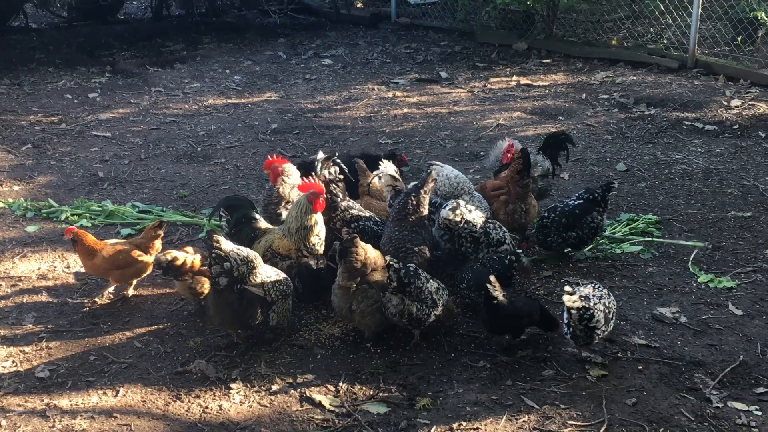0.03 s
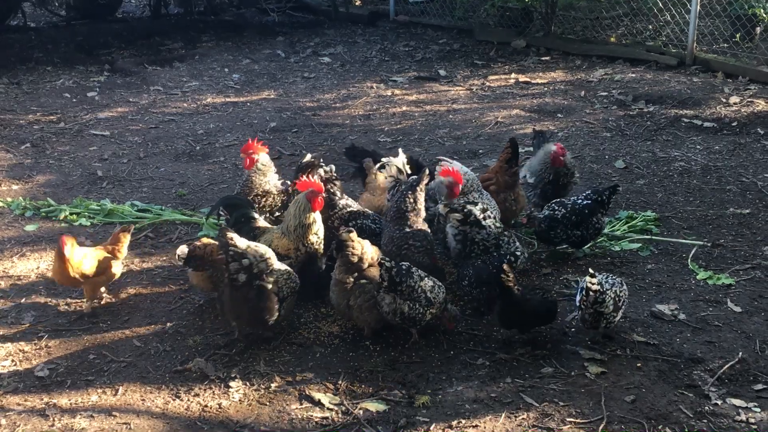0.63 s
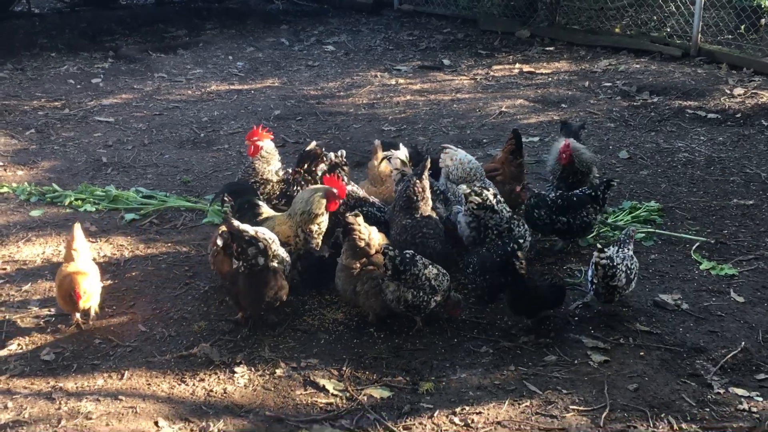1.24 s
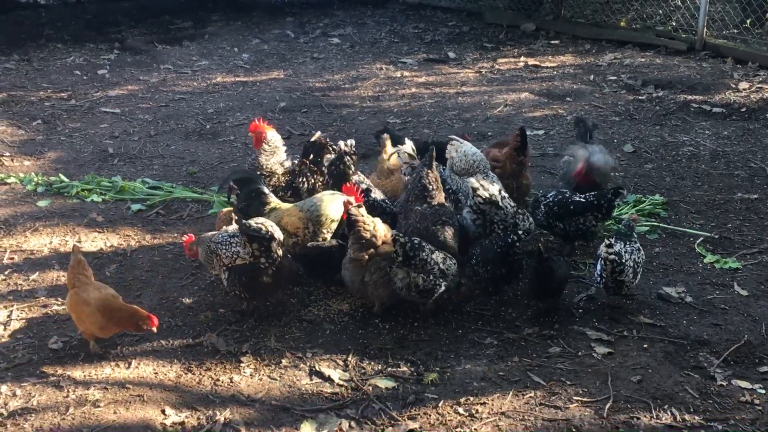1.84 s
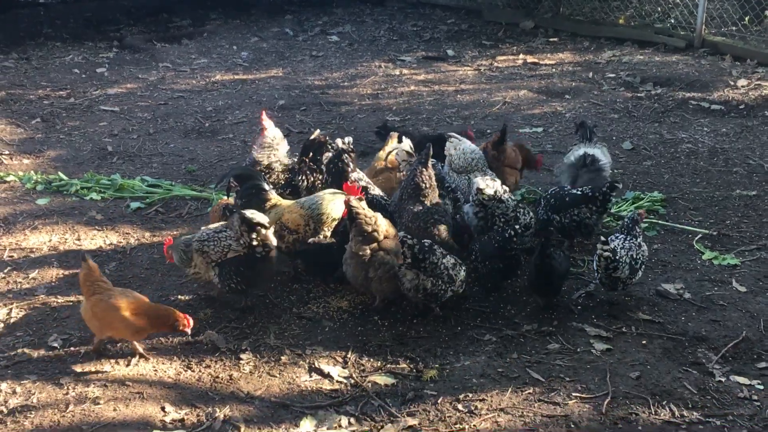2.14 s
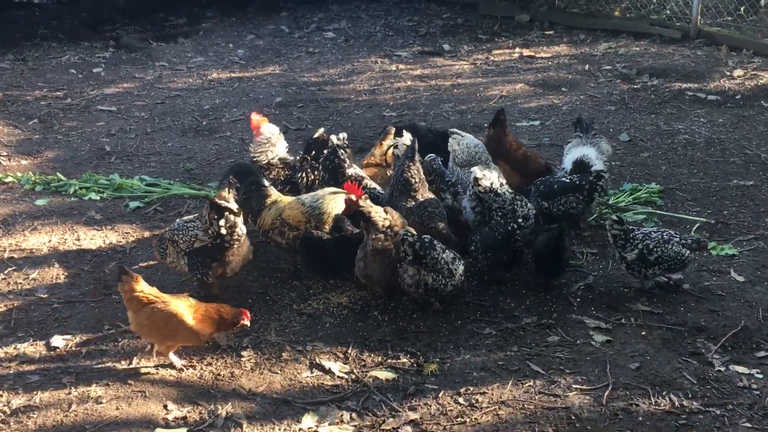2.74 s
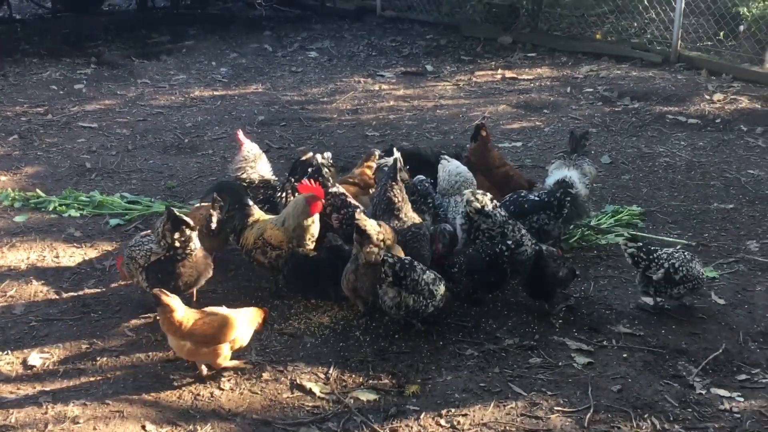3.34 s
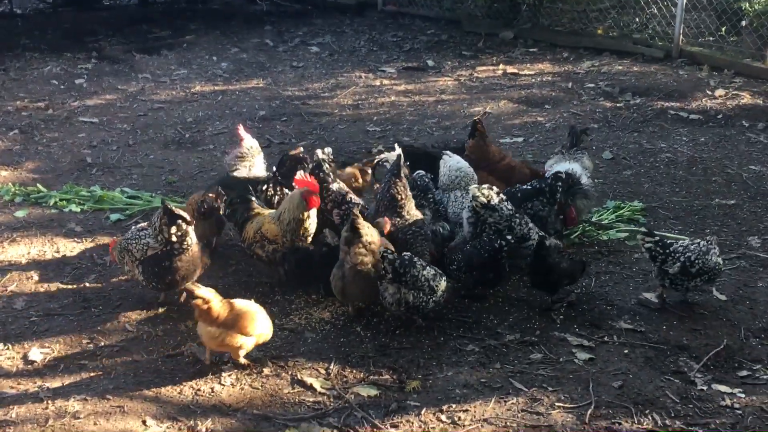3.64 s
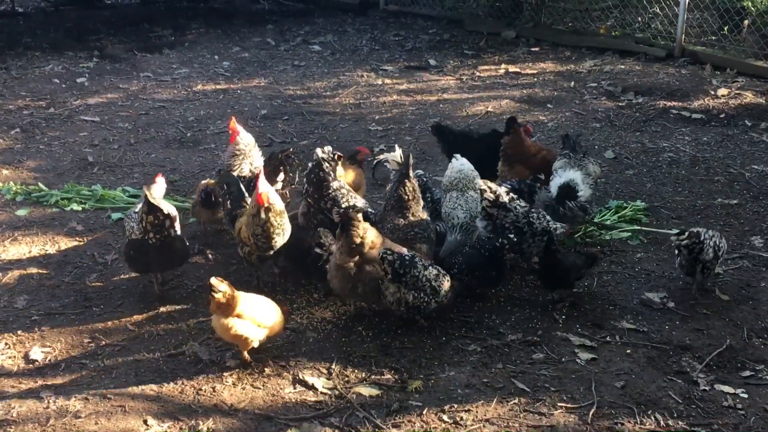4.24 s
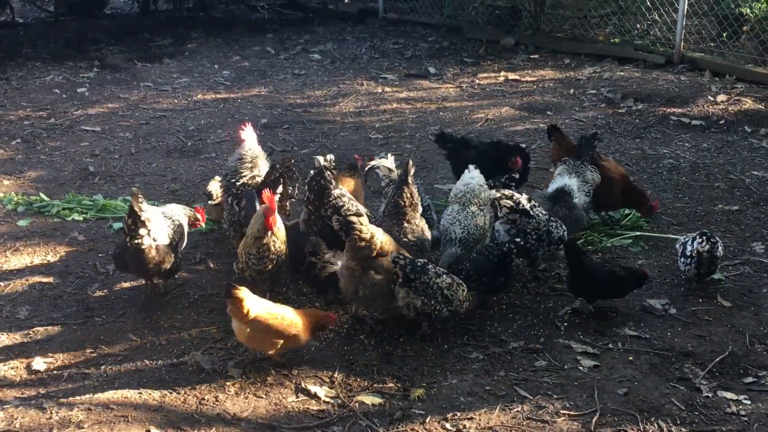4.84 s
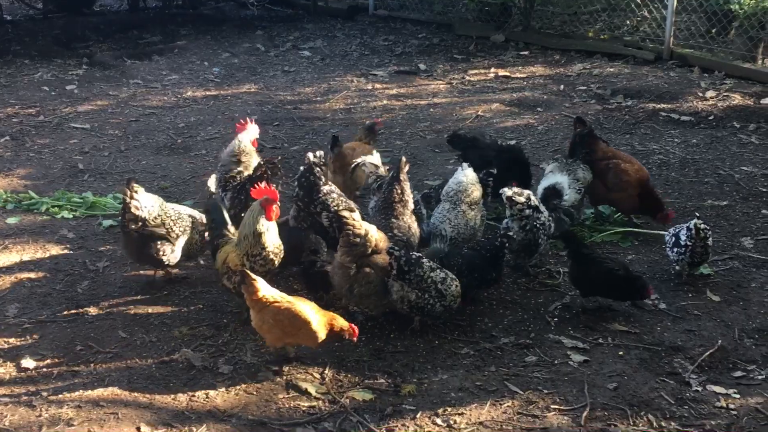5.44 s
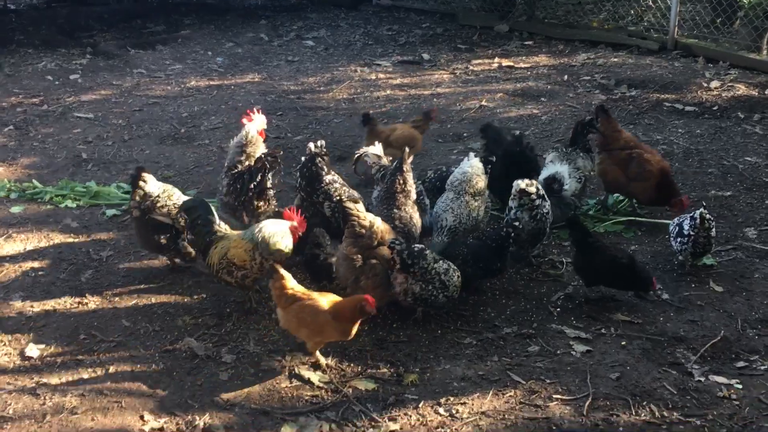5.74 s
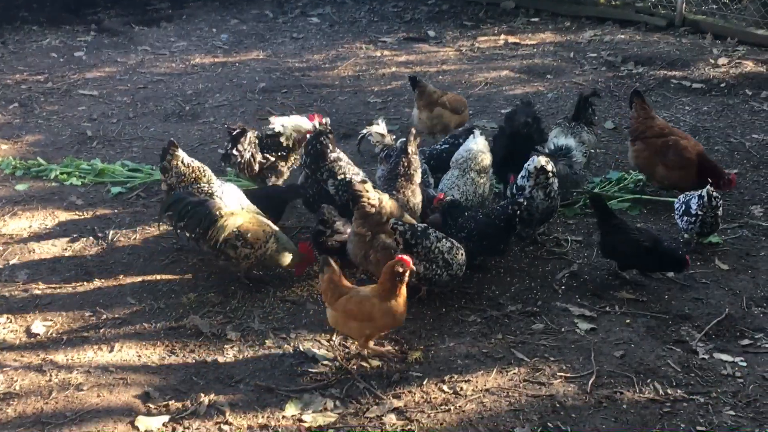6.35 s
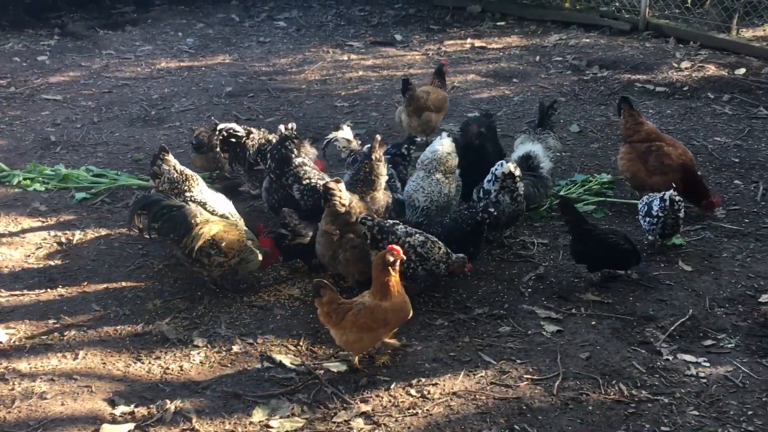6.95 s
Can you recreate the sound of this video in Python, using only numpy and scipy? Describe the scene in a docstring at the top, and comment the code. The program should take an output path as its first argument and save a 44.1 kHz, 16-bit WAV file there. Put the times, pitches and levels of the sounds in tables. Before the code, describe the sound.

A rooster crows once, hoarse then clear, over softly clucking, pecking hens and small birds chirping in a farm yard.

```python
"""A rooster crows in a farm yard under trees: a hoarse first note, then a long one that clears and sinks.
Its syrinx is a harmonic source, filtered by throat and mouth; uneven membrane slaps add a rasp.
Hens cluck, murmur, peck and scratch, small birds whistle gliding chirps, and near the end a distant
rooster crows faintly. Trunks, fence and leaves scatter these sounds into echoes.
Under them lie a low rumble and a faint hiss."""
import sys
import numpy as np
from scipy import signal
from scipy.fft import rfft, irfft
from scipy.io import wavfile
from scipy.ndimage import map_coordinates

SR = 44100
rng = np.random.default_rng(int(sys.argv[2]) if len(sys.argv) > 2 else 0)


def store_pcm(level_fs):
    """Save levels as 16-bit WAV."""
    pcm = np.round(np.clip(level_fs, -1, 1) * 32767).astype(np.int16)
    wavfile.write(sys.argv[1], SR, np.atleast_2d(pcm).T)


N = 316638
TIME = np.arange(N) / SR


def undb(db):
    """Level in decibels to amplitude ratio."""
    return 10 ** (np.asarray(db) / 20)


def unit(x):
    """Normalisation to rms 1."""
    return x / np.sqrt(np.mean(x ** 2) + 1e-20)


def curve(points):
    """Linear interpolation of (t/s, value) points at every sample."""
    return np.interp(TIME, *np.transpose(points))


def spectrum_at(points, hz):
    """Gain of a frequency response (f/Hz, level/dB), interpolated over log frequency."""
    f, db = np.transpose(points)
    return undb(np.interp(np.log(hz + 1), np.log(f), db))


def walk(rate, size=N):
    """Smooth random modulation: a spline through `rate` unit Gaussian values a second."""
    place = np.arange(size) * rate / SR
    return map_coordinates(rng.standard_normal(int(place[-1]) + 4), [place + 1], order=2)


def ring(x, hz, width_hz):
    """Second-order resonance with gain 1 at its centre."""
    return signal.lfilter(*signal.iirpeak(min(hz, .45 * SR), hz / width_hz, fs=SR), x)


def resonate(x, modes):
    """Parallel resonances (f/Hz, bandwidth/Hz, level/dB), each applied twice; rms 1."""
    return unit(sum(undb(db) * ring(ring(x, hz, width), hz, width) for hz, width, db in modes))


def add(track, s, sound):
    """Superposition of a sound on the track from time s."""
    i = max(int(s * SR), 0)
    track[i:i + len(sound)] += sound[:max(N - i, 0)]


def air(hiss_db=-56):
    """Spectral shaping of white noise gives the steady, wide hiss of still air."""
    # f/Hz, relative spectral density/dB
    density = [(30, -20), (55, -1.5), (100, -1), (170, -8.5), (300, -12), (450, -18.5), (900, -14),
               (1400, -20.5), (2100, -20.5), (3400, -20), (5000, -27), (6300, -26), (8000, -33),
               (15500, -39)]
    hz = np.arange(N // 2 + 1) * SR / N
    return undb(hiss_db) * unit(irfft(rfft(rng.standard_normal(N)) * spectrum_at(density, hz), N))


def rumble(rumble_db=-56.5, sway_db=3.5, bump_db=-3, bump_hz=60, bump_s=.054):
    """Amplitude modulation makes low noise sway; short tone bursts are heard as soft bumps."""
    # t/s, relative peak level/dB
    bumps = [(2.105, -41), (2.964, -37.5), (3.5, -37.5), (4.363, -34.5), (6.514, -35.5)]
    out = resonate(rng.standard_normal(N), [(57.1, 34, .5), (97.2, 27, -7)])
    out *= undb(rumble_db + sway_db * walk(9))
    t = TIME[:int(bump_s * SR)]
    bump = np.sin(np.pi * np.sqrt(t / bump_s)) ** 2 * np.sin(2 * np.pi * bump_hz * t)
    for s, db in bumps:
        add(out, s, undb(db + bump_db) * bump)
    return out


def foraging(ticks_per_s=70, spread_db=3, grain_s=.0048, litter_db=-71, peck_db=-69):
    """Random impacts of feet on dry litter and beaks on soil make noise grains; feathers add friction."""
    # the flock shuffling its feathers: t/s, level/dB
    shuffle = [(0, -57), (.6, -55), (1, -59.5), (2.5, -60), (3.7, -61.5), (4.6, -62.5), (7.1, -68.5)]
    ticks = (rng.random(N) < ticks_per_s / SR) * undb(spread_db * np.minimum(rng.exponential(size=N), 3))
    grains = signal.fftconvolve(ticks, np.exp(-TIME[:1024] / grain_s))[:N] * rng.standard_normal(N)
    feathers = undb(curve(shuffle) + 2 * walk(14)) * resonate(rng.standard_normal(N), [(157, 230, 0)])
    litter = undb(litter_db) * resonate(grains, [(2800, 5000, 0)])
    pecks = undb(peck_db) * resonate(grains, [(827, 540, 0)])
    return feathers + litter + pecks


def chirp(length, arch_hz, waver=.019, waver_hz=340, octave_db=-23):
    """A whistle arches through three pitches; fast random modulation makes it buzz slightly; rms 1."""
    u = np.linspace(0, 1, int(length * SR))
    arch = np.polyval(np.polyfit([0, .5, 1], arch_hz, 2), u)
    hz = arch * (1 + waver * walk(waver_hz, size=len(u)))
    phase = 2 * np.pi * np.cumsum(hz) / SR
    swell = signal.windows.tukey(len(u), .35) * undb(3.65 * walk(207.4, size=len(u)))
    # the highest notes are forced, and carry the most octave
    octave = undb(octave_db) * (hz / 5500) ** 4 * np.sin(2 * phase)
    return unit(swell * (np.sin(phase) + octave))


def near_birds(gain_db=-2, arch_octaves=.1, slide_db=-12, slide_s=.05, flick_db=1, flick_s=.011):
    """Frequency sweeps form the calls: arched glides, and high flicks that drop to a low note."""
    # t/s, duration/s, middle f/Hz, glide/octaves, relative level/dB
    glides = [ (0.117, 0.034, 3050, 0.9, -52.5), (0.146, 0.03, 2660, -.6, -61),
              (0.321, 0.024, 4500, 0.4, -52.5), (0.345, .034, 4300, -0.52, -52),
              (0.39, 0.024, 3830, 0.2, -46), (0.809, 0.042, 4280, 0.06, -52),
              (0.851, 0.049, 3400, -0.51, -49.5), (1.079, 0.051, 3810, -0.15, -56.5),
              (1.142, .03, 5700, -.4, -64), (1.154, 0.045, 3590, 0, -54), (1.215, 0.06, 4580, 0, -54.5),
              (1.446, 0.038, 5450, -0.03, -55.5), (1.661, 0.031, 5500, -0.76, -51),
              (1.757, 0.035, 3370, -0.39, -47), (2.006, 0.09, 4090, -0.44, -52),
              (2.111, 0.025, 4710, 0.17, -50), (2.121, 0.2, 5550, -0.45, -53),
              (2.154, 0.036, 3600, -.3, -49.5), (2.55, 0.025, 3320, 0, -54.5),
              (2.62, 0.026, 4700, -0.16, -53), (2.628, 0.073, 3350, 0.42, -57),
              (2.76, 0.035, 2480, -.15, -61), (2.96, 0.035, 3750, -0.12, -49.5),
              (3.109, 0.094, 5720, -0.24, -55), (3.117, 0.11, 4150, -0.5, -55.5),
              (3.249, 0.1, 6000, -.2, -63), (3.307, 0.05, 2800, .7, -58),
              (3.466, 0.044, 3195, -0.52, -59.5), (3.592, 0.03, 1764, 0.12, -55),
              (3.601, 0.079, 4010, .4, -52.5), (3.664, 0.061, 3324, -0.36, -46.5),
              (4.018, 0.047, 2810, 0.55, -56.5), (4.045, 0.048, 4520, -0.33, -48),
              (4.115, 0.028, 4050, .15, -46.5), (4.24, .03, 1950, 0.32, -59),
              (4.237, 0.07, 3050, -0.54, -52), (4.411, 0.021, 5900, -0.45, -58),
              (4.525, .025, 7400, 0.2, -61), (4.527, 0.06, 4400, 0.33, -55),
              (4.564, 0.018, 5320, -0.16, -54), (4.574, 0.05, 3400, -0.44, -55.5),
              (4.629, 0.016, 3900, 0.4, -42.5), (4.746, .08, 2500, -.45, -60.5),
              (4.803, 0.039, 3750, -0.2, -55), (4.933, 0.076, 3870, -0.5, -54.5),
              (5.061, 0.047, 3900, -0.15, -51.5), (5.165, 0.012, 3910, 0.12, -49.5),
              (5.191, 0.017, 5700, -0.54, -55), (5.245, 0.038, 2075, -0.19, -56.5),
              (5.274, 0.088, 3330, -0.78, -51.5), (5.509, 0.091, 5480, -0.34, -52),
              (5.555, 0.042, 4175, 0.58, -52.5), (5.594, 0.058, 3750, -0.39, -49.5),
              (5.784, 0.03, 3700, -0.3, -49), (5.951, 0.039, 4250, 0.16, -47.5),
              (5.996, 0.052, 3300, -0.48, -47.5), (6.038, 0.024, 5800, -0.4, -53),
              (6.234, 0.015, 3750, -0, -49), (6.239, .01, 2000, .5, -54), (6.249, 0.04, 3050, -0.27, -49.5),
              (6.401, 0.063, 5690, 0.02, -50.5), (6.46, 0.039, 3490, .45, -53.5),
              (6.518, 0.014, 5500, -0.45, -53), (6.676, 0.026, 3470, -0.55, -53),
              (6.708, 0.046, 4050, -0.33, -52), (6.904, 0.026, 4350, -0.01, -50),
              (6.952, 0.044, 3523, -0.02, -48)]
    # flick and low note: t/s, relative level/dB
    two_step_calls = [(0.393, -49.5), (2.556, -53), (2.63, -52), (4.051, -58.5), (4.348, -59), (4.695, -54),
                      (5.687, -49), (6.693, -56.5)]
    out = np.zeros(N)
    for s, length, hz, glide, db in glides:
        arch_hz = hz * 2 ** np.array([-glide / 2 - arch_octaves, 0, glide / 2 - arch_octaves])
        buzz = .0211 * (hz / 4200) ** 2
        add(out, s, undb(db + gain_db) * chirp(length, arch_hz, waver=buzz))
        if glide < 0:  # falling calls trail off in a soft slide
            slide = chirp(slide_s, arch_hz[2] * np.linspace(1.12, .75, 3))
            add(out, s + .73 * length, undb(db + slide_db) * slide)
    for s, db in two_step_calls:
        add(out, s - flick_s, undb(db + flick_db) * chirp(flick_s, arch_hz=(3870, 3303, 2820)))
        add(out, s, undb(db + gain_db) * chirp(.0129, arch_hz=(1764, 1496, 1330)))
    return out


def hens_and_distant_rooster(throat_width_hz=380, chest=.29, rise=.0279):
    """Formant filtering: one throat resonance weights the harmonics; the chest adds some fundamental."""
    # hen clucks and murmurs, then in the last row a faint, distant rooster's crow:
    # t/s, duration/s, pitch f/Hz, throat f/Hz, flutter/fraction of pitch, level/dB
    calls = [(0.205, 0.037, 305, 800, 0.12, -49.5), (0.247, 0.032, 316, 1050, 0.13, -53.5),
             (1.044, 0.031, 267, 300, 0.025, -53.5), (1.454, 0.036, 198, 587, 0.29, -50),
             (1.515, 0.037, 195.3, 420, 0.25, -50.5), (1.55, 0.086, 220, 223, 0.009, -51),
             (1.797, 0.045, 212.8, 800, 0.23, -45), (1.838, 0.14, 226.8, 443, 0.18, -50),
             (1.914, 0.12, 226, 228, 0.008, -55), (4.039, 0.39, 277.4, 825, 0.049, -64.5),
             (4.085, 0.29, 269, 280, 0.009, -62), (5.43, 0.045, 413, 840, 0.065, -54.5),
             (6.048, .15, 381, 1230, 0.095, -64), (6.201, 0.73, 361.4, 858, 0.0042, -69)]
    out = np.zeros(N)
    for s, length, pitch_hz, throat_hz, flutter, db in calls:
        u = np.linspace(0, 1, int(length * SR))
        hz = pitch_hz * (1 + rise * (u - .5)) * (1 + flutter * walk(298.6, size=len(u)))
        phase = 2 * np.pi * np.cumsum(hz) / SR
        note = chest * np.sin(phase)
        for k in range(1, 9):
            detuning = 2 * (k * hz - throat_hz) / throat_width_hz
            note += np.sin(k * phase) / (1 + detuning ** 2)
        add(out, s, undb(db) * unit(note * np.sin(np.pi * u ** .9)))
    return out


def far_birds(far_db=-60, centre_hz=4150, spread_octaves=.62, calls_per_s=34, strays=54, stray_db=-66):
    """Thin whistles overlap in bouts, with strays between; attenuation with distance dims the highest."""
    # t/s, duration/s, relative level/dB
    bouts = [(.32, .12, -9.5), (1.059, .15, -1), (1.66, .12, -0.5), (2.08, .22, 6.5), (2.576, .24, -1.5),
             (2.924, .1, -3.5), (3.109, .16, -0.5), (3.311, .2, -2.5), (3.582, .18, 4), (4.017, .14, 2.5),
             (4.218, .1, 2), (4.529, .22, 0.5), (4.76, .2, 0), (5.001, .32, -2.5), (5.519, .2, 2),
             (5.932, .12, -0.5), (6.206, .09, 2), (6.387, .14, 2.5), (6.626, .14, -2.5), (6.92, .1, -7)]
    calls = []
    for s, length, db in bouts:
        count = int(length * calls_per_s) + 1
        calls += [(s + length * (k + rng.random()) / count, db + far_db) for k in range(count)]
    calls += [(s, stray_db) for s in rng.uniform(1, 7, strays)]
    out = np.zeros(N)
    for s, db in calls:
        top_hz = centre_hz * 2 ** rng.uniform(-spread_octaves, spread_octaves)
        length = rng.uniform(.03, .085)
        gain = undb(db + 3 * rng.uniform(-.47, 1)) / (1 + (top_hz / 5800) ** 4)
        arch_hz = top_hz * np.array([.85, 1, .68]) ** rng.uniform(.3, 1.31, 3)
        add(out, s - length / 2, gain * chirp(length, arch_hz, waver=.025))
    return out


def rasp(slap_hz=170):
    """Impulse excitation: uneven slaps of the syrinx membranes, mixed with noise, ring the throat."""
    # f/Hz, bandwidth/Hz, relative level/dB
    throat_modes = [(594.3, 43, 6), (1036, 157, -2), (1440, 180, 3.5), (1823, 315, -2), (2800, 180, -10.5),
                    (4400, 1300, -27.5)]
    cycles = np.floor(np.cumsum(slap_hz * np.exp(.54 * walk(200))) / SR)
    slaps = unit(np.diff(cycles, prepend=0) * undb(.39 * walk(150)))
    return resonate(slaps + 1.45 * rng.standard_normal(N), throat_modes)


def crow_tone(flutter, flutter_hz=150, trill_hz=38, shimmer=9, overtone_db=-46, turbulence_db=21):
    """Source and filter: the syrinx's harmonics slide through fixed resonances of mouth and throat."""
    # the short note breaks upward: t/s, f/Hz
    short_pitch = [(.65, 537.6), (.69, 558.6), (.71, 694.6), (.9, 690.7)]
    # the long note catches once, holds and sinks: t/s, f/Hz
    long_pitch = [(.99, 669.3), (1.05, 755.8), (1.136, 697.3), (1.19, 760.7), (1.422, 718.9),
                  (1.599, 703.2), (1.82, 715.5), (2.199, 684.2), (2.325, 649.4), (2.365, 585)]
    # response to harmonics 1-3: f/Hz, gain/dB
    mouth = [(540, -25.5), (650, -34.5), (750, -35.5), (1050, -55), (1300, -27), (1430, -29.5),
             (1550, -31.5), (1700, -60), (1920, -27.5), (2020, -39), (2120, -56.5), (2300, -53)]
    # response to harmonics 4-17: f/Hz, relative gain/dB
    throat = [(2800, 4), (3550, -25), (4250, -10), (4950, -33), (5700, -17), (6300, -36.5), (7000, -20.5),
              (7700, -40), (8300, -30), (8900, -33), (9800, -24), (10600, -50), (11500, -34.5),
              (12500, -51)]
    # noise bands of the open beak: f/Hz, bandwidth/Hz, relative level/dB
    turbulence = [(3270, 230, 1), (4030, 810, 0), (8300, 1100, -17)]
    # the fundamental thins and returns: t/s, gain/dB
    fundamental = [(.7, -0.5), (1.05, 1.5), (1.3, 5), (1.5, 3.5), (1.64, -7.5), (1.71, 5.5), (1.86, 1),
                   (1.98, -7.5), (2.28, -1.5), (2.36, 7.5)]
    # upper harmonics and hiss against the low harmonics: t/s, relative gain/dB
    brightness = [(.7, -7), (.9, 0.5), (1.02, -0.5), (1.4, 4), (1.55, -2.5), (1.65, 2), (1.75, -2),
                  (2.15, -0.5), (2.27, -5), (2.35, -13)]
    pitch = curve(short_pitch + long_pitch)
    trill = np.sin(2 * np.pi * np.cumsum(trill_hz * (1 + .2537 * walk(30))) / SR)
    shake = .778 * walk(flutter_hz) + .85 * trill + .364 * walk(600)
    phase = 2 * np.pi * np.cumsum(pitch * (1 + flutter * shake)) / SR
    first, second, third = (spectrum_at(mouth, k * pitch) * np.sin(k * phase) for k in range(1, 4))
    lower = undb(curve(fundamental)) * first + second + third
    upper = sum(spectrum_at(throat, k * pitch) * np.sin(k * phase) for k in range(4, 18))
    # the harder the flutter, the more the air stream hisses
    upper += undb(turbulence_db) * flutter * resonate(rng.standard_normal(N), turbulence)
    tone = lower + undb(overtone_db + curve(brightness)) * upper
    return np.sqrt(2) * tone * (1 + shimmer * flutter * walk(flutter_hz))


def rooster(gain_db=-2, attack_s=.019, release_s=.037, settles_at_s=1.4, settling_s=.051, rasp_db=-54):
    """Irregular oscillation: the forced syrinx flutters and rasps, then settles into a clear tone."""
    # start t/s, end t/s, relative level/dB
    notes = [(0.656, 0.883, -2.5), (0.99, 2.345, -0.5)]
    # swell of the long note, whose first value also holds for the short one: t/s, relative level/dB
    loudness = [(.99, -8), (1.04, 0), (1.3, -2), (1.38, -3), (1.54, -1), (1.72, -3.5), (1.89, -1.5),
                (1.95, 2.5), (2.03, 0.5), (2.1, -6.5), (2.16, 0), (2.34, -6.5)]
    # the voice cracks into a rasp: t/s, duration/s, relative level/dB
    voice_cracks = [(0.644, 0.12, -45), (0.755, 0.13, -39), (.987, .014, -33.5), (1.077, .065, -37.5),
                    (1.531, 0.092, -35)]
    sounding, effort, cracks = np.zeros((3, N))
    for start, end, db in notes:
        gate = np.clip((TIME - start) / attack_s, 0, 1) * np.clip(1 - (TIME - end) / release_s, 0, 1)
        sounding += gate
        effort += gate * undb(db + curve(loudness))
    for s, length, db in voice_cracks:
        add(cracks, s, undb(db) * signal.windows.tukey(int(length * SR), .5))
    forced = .5 - .5 * np.tanh((TIME - settles_at_s) / (2 * settling_s))
    flutter = .0023 + .0223 * forced + .78 * cracks
    hoarseness = cracks + sounding * undb(rasp_db) * forced
    return undb(gain_db) * (effort * crow_tone(flutter) + hoarseness * rasp())


def yard(x, wet_db, t60, gap_s, lowpass_hz=6180):
    """Reverberation: scattering from trunks, fence and leaves adds a dull, exponentially fading tail."""
    t = np.arange(SR) / SR
    scatter = rng.standard_normal(SR) * np.exp(.5 * rng.standard_normal(SR))
    dull = signal.sosfilt(signal.butter(2, lowpass_hz, fs=SR, output="sos"), scatter)
    build_up = 1 - np.exp(-(t / gap_s) ** 2)
    tail = dull * np.exp(-np.log(1000) * t / t60) * build_up
    return x + undb(wet_db) * signal.fftconvolve(x, tail / np.linalg.norm(tail))[:N]


def scene():
    """Reverberation suggests distance: hens near, the main rooster further, birds deep in the trees."""
    crow = yard(rooster(), wet_db=-7.5, t60=.45, gap_s=.0088)
    fowl = yard(hens_and_distant_rooster() + foraging(), wet_db=-9.5, t60=.45, gap_s=.027)
    chirps = yard(near_birds(), wet_db=-4.5, t60=.33, gap_s=.01)
    twitter = yard(far_birds(), wet_db=-2.5, t60=.33, gap_s=.01)
    return (crow + fowl + chirps + twitter + air() + rumble())[None]


def record(dry, notch_hz=10500, notch_depth=.3, top_hz=15700):
    """Linear filtering: the microphone port dips the treble and the recorder's low-pass cuts the top."""
    coloured = dry - notch_depth * ring(dry, notch_hz, width_hz=750)
    return signal.sosfilt(signal.ellip(10, .2, 70, top_hz, fs=SR, output="sos"), coloured)


dry = scene()
out = record(dry)
store_pcm(out)
```